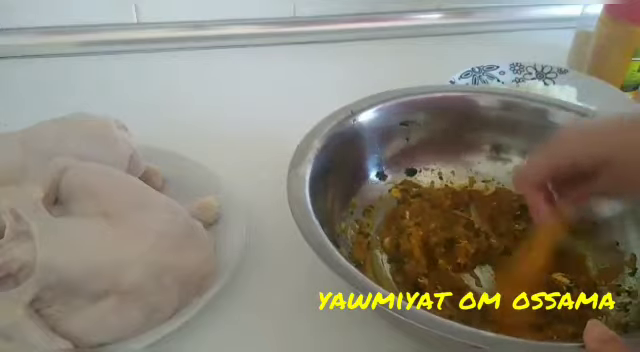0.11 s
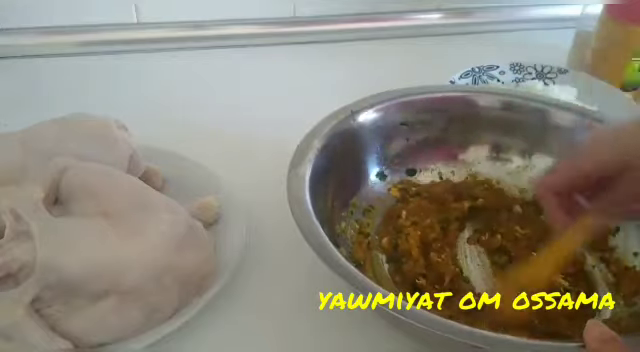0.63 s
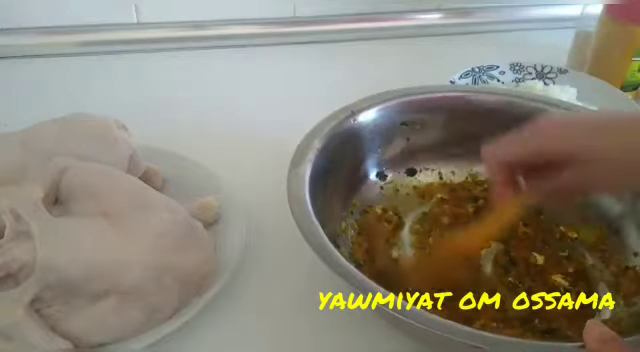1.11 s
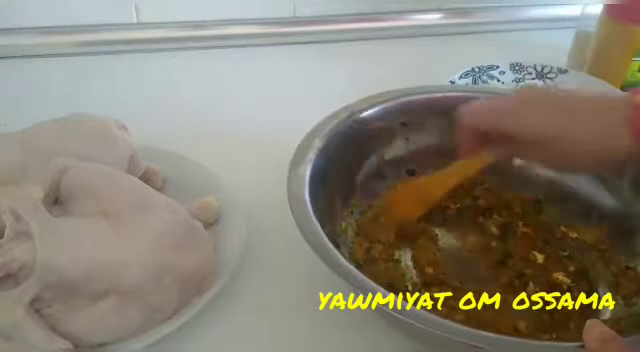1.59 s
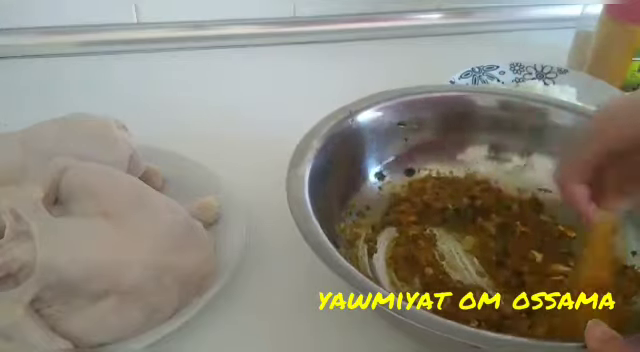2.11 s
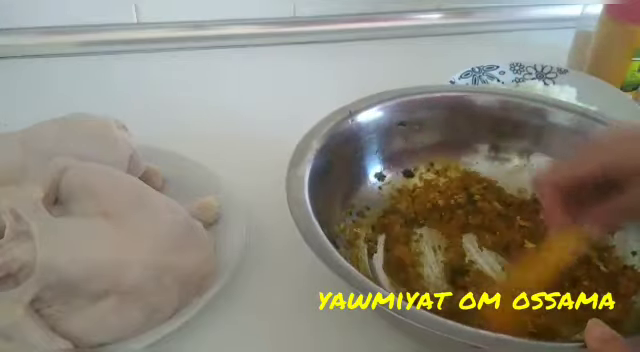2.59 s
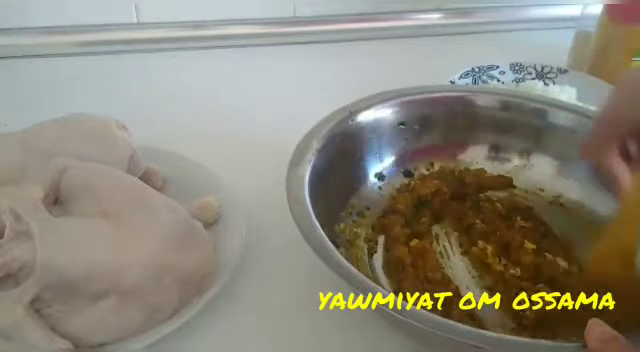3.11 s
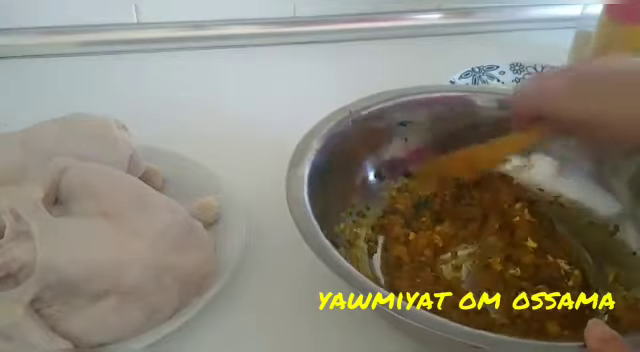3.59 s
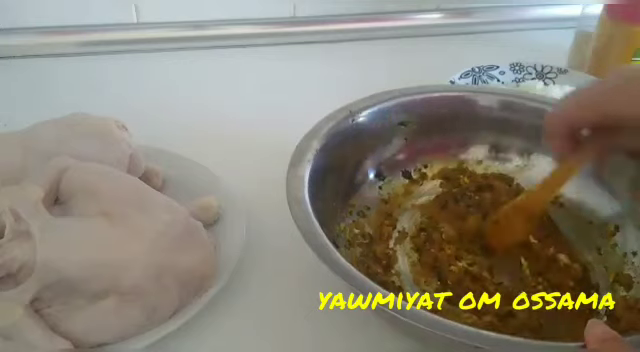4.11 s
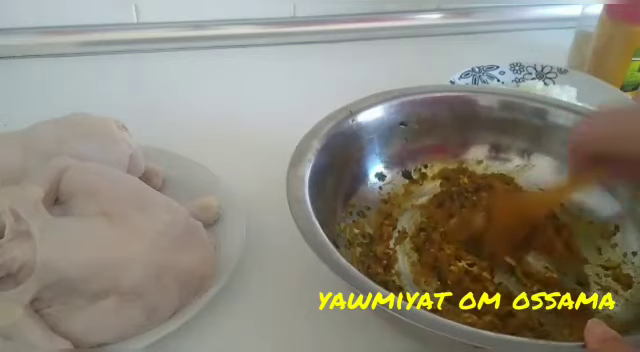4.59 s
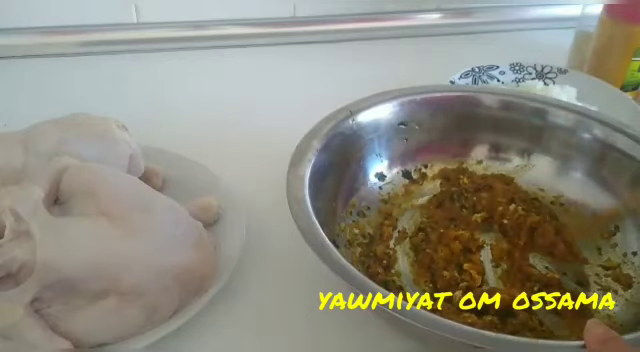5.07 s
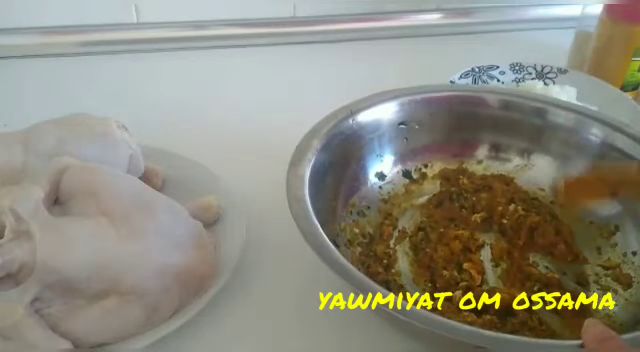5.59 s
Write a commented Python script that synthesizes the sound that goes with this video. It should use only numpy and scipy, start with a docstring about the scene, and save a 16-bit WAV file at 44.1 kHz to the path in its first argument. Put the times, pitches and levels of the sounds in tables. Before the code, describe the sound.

Close wet stirring and scraping in a metal bowl, quiet and uneven, broken by a metallic tap and ending on a hard rattling bang.

```python
"""Stirring thick marinade in a steel bowl

On a kitchen counter, near a phone with two microphones, a spatula stirs thick marinade in a steel bowl.
Splashes of noise are the blade smacking the paste, ringing modes are its knocks on the bowl, and friction noise
through resonances is its drag along the wall, with squeaks, dry ticks and spells of steady narrow-band noise.
The tiled kitchen answers over a low rumble; the phone's noise suppressor thins out whatever is quiet."""
import sys
import numpy as np
from scipy import signal
from scipy.fft import rfft, irfft, next_fast_len
from scipy.io import wavfile
from scipy.ndimage import uniform_filter1d, map_coordinates

SR = 44100
rng = np.random.default_rng(int(sys.argv[2]) if len(sys.argv) > 2 else 0)


def makeup_ratio(level_db):
    """Linear amplitude ratio for a level in decibels (20 dB per factor of ten)."""
    decades = np.asarray(level_db, float) / 20
    return 10 ** decades


def unload_audio(sound):
    """Save the sound as a 16-bit wav file, at the path given as the first command line argument."""
    columns = np.transpose(np.atleast_2d(sound))
    # keep every value between -1 and 1, then stretch to whole-number steps
    steps = np.round(np.clip(columns, -1, 1) * 32767)
    wavfile.write(sys.argv[1], SR, steps.astype(np.int16))


N = 251811


def unit(x):
    """Scaled to rms 1."""
    return x / np.sqrt(np.mean(x ** 2) + 1e-20)


def along(points, hz):
    """Interpolates (Hz, value) points on a log frequency axis."""
    f, v = np.transpose(points)
    return np.interp(np.log(hz + 1), np.log(f + 1), v)


def wobble(rate):
    """A smooth random curve, rate knots a second."""
    return map_coordinates(rng.standard_normal(int(N * rate / SR) + 4), [np.arange(N) * rate / SR])


def filtered(x, response):
    """x times a complex response of frequency."""
    m = next_fast_len(x.shape[-1] + 8192)
    spectrum = rfft(x, m) * response(np.fft.rfftfreq(m, 1 / SR))
    return irfft(spectrum, m)[..., :x.shape[-1]]


def ringing(modes, f):
    """Causal response of resonances (Hz, width Hz, dB), added with alternating sign."""
    total = 0
    for k, (centre, width, db) in enumerate(modes):
        total = total + (-1) ** k * makeup_ratio(db) * 1j * f * width / (centre * centre - f * f + 1j * f * width)
    return total


# How alike the two microphones hear diffuse noise.
# Each row: frequency in Hz, left-right likeness from 0 to 1.
LIKENESS = [(60, 0.96), (130, 0.94), (280, 0.65), (620, 0.3), (1300, .03)]


def pair(n):
    """Stereo white noise, alike in the bass and almost unrelated in the treble."""
    def mid_and_side(hz):
        turn = np.arccos(np.clip(along(LIKENESS, hz), -1, 1)) / 2
        return np.array([np.cos(turn), np.sin(turn)])
    mid, side = filtered(rng.standard_normal((2, n)), mid_and_side)
    return np.array([mid + side, mid - side])


def patchy(x, depth_db):
    """Random gain streaks of depth_db rms, a few hundred Hz wide and under a tenth of a second long."""
    z = signal.stft(x, nperseg=512)[2]
    field = uniform_filter1d(rng.standard_normal(z.shape[1:]), size=3, axis=0)
    field = uniform_filter1d(field, size=12, axis=1)
    return signal.istft(z * makeup_ratio(depth_db * unit(field)), nperseg=512)[1][:, :N]


def burst(rise_ms, fall_ms, span):
    """An envelope, span seconds long, that swells to its peak and fades by 1/e every fall_ms."""
    ms = np.arange(round(span * SR)) / SR * 1000
    swell = np.minimum(ms / max(rise_ms, .03), 1) ** 0.57
    return swell * np.exp(-np.maximum(ms - rise_ms, 0) / max(fall_ms, .05))


# Deep layer of the rumble. Each row: time in seconds, rms level in dB.
RUMBLE = [(0.0, -81), (0.09, -67), (0.43, -82), (1.46, -87), (1.61, -68.5), (2.64, -64.5), (2.77, -73.5),
          (3.47, -67), (4.01, -80), (4.1, -64.5), (4.42, -77), (4.63, -56), (4.86, -63), (4.94, -55.5),
          (5.2, -70.5), (5.71, -64.5)]
# Colour of the steady room noise. Each row: frequency in Hz, relative level in dB.
AIR = [(120, -58.5), (200, -5.5), (330, -3), (500, -1.5), (927, -2), (1140, -12.5), (1270, -7), (2670, -6),
       (7160, -9.5), (11100, -8.5), (13500, -10)]
AIR_DB = -60  # rms


def rumble():
    """Noise through two broad low resonances swells and sinks unevenly over the steady air of the room."""
    times, levels = np.transpose(RUMBLE)
    deep_db = np.interp(np.arange(N) / SR, times, levels)

    def hump(centre_hz, width_hz):
        return unit(filtered(pair(N), lambda hz: ringing([(centre_hz, width_hz, 0)], hz) ** 2))
    air = unit(patchy(filtered(pair(N), lambda hz: makeup_ratio(along(AIR, hz))), depth_db=1.0))
    upper_db = deep_db - 6
    return makeup_ratio(deep_db) * hump(56.1, 29.0) + makeup_ratio(upper_db) * hump(128.0, 45) + makeup_ratio(AIR_DB) * air


# Strokes along the wall. Each row: time of most pressure in seconds, hiss level in dB,
# weight on the steel in dB, build-up in seconds per 10 dB, let-go in seconds per 10 dB.
STROKES = [(.0, -57, -4, .1, 0.077), (0.222, -59, -1.5, 0.035, 0.089), (.36, -75, -17, 0.15, 0.022),
           (.49, -60.5, -12, 0.021, 0.07), (0.568, -50, -6.5, 0.051, 0.071), (.76, -52, -17, 0.043, 0.16),
           (1.1, -59.5, -9, 0.23, 0.066), (1.429, -54.5, -6.5, 0.068, 0.041),
           (1.725, -53.5, 0.5, 0.1, 0.047), (2.155, -54, -15, 0.27, 0.16),
           (2.533, -50.5, -7.5, 0.075, 0.062), (2.739, -64.5, -4.5, 0.062, 0.06),
           (2.931, -67, -31, .1, 0.18), (3.16, -58.5, -4.5, 0.13, 0.012), (3.29, -57, -6, 0.094, 0.33),
           (3.62, -68.5, -0.5, 0.19, 0.35), (3.69, -63, -5, 0.072, 0.14), (3.929, -62, -12, 0.027, 0.17),
           (4.39, -53, -8, 0.042, 0.033), (4.5, -81, 12, 0.19, 0.048), (4.679, -63, 12.5, 0.13, 0.14),
           (4.9, -62, -15.5, 0.21, 0.17), (5.49, -60.5, 1, 0.15, 0.029)]
GROAN_DB, RASP_DB, RASP_PER_WEIGHT = -3, -2, 0.77  # dB over the hiss; dB per dB of weight


def pressure():
    """Gains over time of groan, rasp and hiss, which take all, part and none of each stroke's weight."""
    t = np.arange(0, N + 64, 64) / SR
    s, db, weight_db, rise, fall = np.transpose(STROKES)[..., None]
    hiss_db = db - 10 * np.where(t < s, (s - t) / rise, (t - s) / fall)
    lifts = (GROAN_DB + weight_db, RASP_DB + RASP_PER_WEIGHT * weight_db, 0)
    return [np.interp(np.arange(N) / SR, t, makeup_ratio(hiss_db + lift).sum(0)) for lift in lifts]


# The paste-damped bowl on its counter. Each row: mode in Hz, width in Hz, relative level in dB.
BOWL = [(120, 37, 14.5), (236, 26, 4.5), (303, 54, -2.5), (445.6, 73, -5.5), (523.5, 24.5, -4.5),
        (610, 23, -13), (668, 17, -5), (706, 22.5, 0.5), (783, 29.5, -6.5), (831.6, 30, -4),
        (1008, 136, -11.5), (1251, 79, -10), (1564, 120, -10.5), (1712, 65, -11.5), (2144, 130, -14.5)]
# The thin rim of the bowl. Each row: mode in Hz, width in Hz, relative level in dB.
RIM = [(2770, 11, -5), (3695, 27, -4.5), (4510, 55, 1), (5910, 55, 4), (6300, 140, -6.5), (7080, 400, -7),
       (8150, 54, -12), (8640, 250, -30), (9760, 1300, -17), (11000, 61, -4.5)]
# Colour of the low noise, in smacks and rasp. Each row: frequency in Hz, relative level in dB.
BODY = [(900, -17), (1500, -3), (2500, -1.5), (4000, -6), (6500, -38.5)]
# Colour of the high noise, in smacks and hiss. Each row: frequency in Hz, relative level in dB.
SIZZLE = [(900, -19.5), (1800, -19.5), (2800, 1), (4000, 3), (6000, 5), (9000, 5.5), (12000, 7),
          (14000, -3.5)]


def drag():
    """The blade rubs the wall: friction groans in the bowl; gritty noise rasps and hisses, tinged by the rim."""
    # spice grains catch under the edge, about 300 a second
    catches = (rng.random(N) < 300 / SR) * makeup_ratio(rng.normal(1, 5, N))
    grit = makeup_ratio(1.77 * wobble(30.114) + 0.75 * wobble(130))
    grit = grit + np.convolve(catches, burst(0.77, 0.65, 0.017))[:N]

    def groan_tone(hz):
        return (0.64 + ringing(BOWL, hz)) / (1 + (420 / (hz + 1)) ** 3) / (1 + (hz / 1000) ** 4)

    def rub(colour):
        noise = filtered(grit * pair(N), lambda hz: makeup_ratio(along(colour, hz)) * (1 + 0.2 * ringing(RIM, hz)))
        return unit(patchy(noise, depth_db=4.0))
    groan = unit(filtered(patchy(pair(N), depth_db=5.5), groan_tone))
    groan_gain, rasp_gain, hiss_gain = pressure()
    return groan_gain * groan + rasp_gain * rub(BODY) + hiss_gain * rub(SIZZLE)


def narrow_spells(spells, gain):
    """Noise through blurred resonances, drifting in pitch, each spell swelling and fading."""
    out = np.zeros((2, N + 2 * SR))  # one second of room before the start
    waver = 1 + 0.007 * wobble(12)  # share by which the pitch drifts
    for start, end, bands, db in spells:
        n = round((end - start) * SR)
        band = unit(filtered(pair(n), lambda hz: sum(ringing([b], hz) ** 2 for b in bands)))
        when = (round(start * SR) + np.arange(n)) % N
        clock = np.cumsum(waver[when])
        clock = clock * (n - 1) / clock[-1]
        band = np.array([np.interp(clock, np.arange(n), side) for side in band])
        swell = np.sin(np.pi * np.arange(n) / n) ** 0.41
        out[:, round((start + 1) * SR):][:, :n] += makeup_ratio(db) * band * gain[when] * swell
    return out[:, SR:SR + N]


# Spells of steady narrow-band noise: low rumble swells below 140 Hz, fuzzy held tones above.
# Each row: start in seconds, end in seconds, centre in Hz, resonance width in Hz, level in dB before the swell.
HELD_BANDS = [(-.1, .55, 883, 108, -67.5), (-.1, 0.368, 1325, 150, -74.5), (0.602, 0.957, 910, 240, -64.5),
              (0.895, 1.047, 1048, 59, -71.5), (1.085, 1.285, 990, 190, -70.5),
              (1.028, 1.316, 1282, 87, -72), (1.372, 1.472, 2257, 130, -53), (1.329, 1.411, 400, 45, -66),
              (1.622, 1.902, 726, 9.6, -71.5), (1.656, 1.87, 357, 29, -67), (1.98, 2.68, 136, 67, -58.5),
              (2.12, 2.308, 464, 22, -70.5), (2.44, 2.76, 849, 8.7, -68.5), (2.545, 2.596, 2296, 68, -56),
              (2.92, 3.4, 130, 35, -67.5), (3.087, 3.249, 444, 45, -67.5), (3.35, 3.8, 502, 26, -68.5),
              (3.547, 3.995, 601.7, 23, -62.5), (3.959, 4.274, 610, 29, -68),
              (4.349, 5.354, 587.6, 53, -62.5), (4.419, 4.66, 1934, 104, -66.5),
              (4.579, 4.753, 1690, 100, -60), (4.498, 5.443, 65, 8, -68), (4.578, 5.047, 653, 510, -55),
              (4.759, 5.091, 117, 13, -65.5), (5.0, 5.355, 2686, 38, -74), (5.271, 5.566, 2594, 42, -72),
              (5.001, 5.555, 1330, 53, -73), (5.011, 5.531, 1964, 160, -73), (5.05, 5.552, 878, 63, -67),
              (5.152, 5.295, 1478, 50, -66.5), (5.002, 5.535, 416, 230, -75.5),
              (5.284, 5.557, 744, 8.6, -63), (5.53, 5.78, 115, 55, -51)]


def held_bands():
    """Low rumble swells and fuzzy held tones: noise in one narrow band per spell."""
    spells = [(start, end, [(hz, width, 0)], db) for start, end, hz, width, db in HELD_BANDS]
    return narrow_spells(spells, np.ones(N))


# How long the tiled kitchen rings.
# Each row: frequency in Hz, time in seconds for the tail to fall by 60 dB.
KITCHEN = [(100, 0.5), (250, 0.26), (600, 0.3), (2000, 0.41), (6000, 0.37), (12000, 0.26)]


def add(out, s, sound, wet_db):
    """Adds a sound with its own kitchen tail, each frequency dying at its own speed; left is slightly louder."""
    hz, t, z = signal.stft(pair(SR // 3), SR, nperseg=256)
    decay = makeup_ratio(-60 * t / along(KITCHEN, hz)[:, None])
    tail = signal.istft(z * decay, SR, nperseg=256)[1]
    tail *= (1 - np.exp(-np.arange(tail.shape[1]) / SR / .007)) ** 2  # walls answer after a few ms
    wet = signal.fftconvolve(sound, makeup_ratio(wet_db) * tail / np.linalg.norm(tail[0]), axes=1)
    wet[:, :sound.shape[1]] += sound
    out[:, round(s * SR):][:, :wet.shape[1]] += wet * makeup_ratio([[.35], [-.35]])


# Wet smacks of the blade. Each row: time of the peak in seconds, sizzle level in dB, body level in dB,
# rise in ms, share thrown into the kitchen in dB.
SMACKS = [(0.113, -48.5, -84, 1.16, 0), (0.183, -53.5, -80, 9.4, 0), (0.2634, -43, -37.5, 3.6, -5),
          (0.535, -42, -31.5, 3.8, 0.5), (0.553, -38, -31, 2.24, -9.5), (0.644, -45, -38.5, 1.73, 4.5),
          (0.839, -47.5, -41.5, 16, -1), (0.949, -47, -54.5, 2.45, -1), (1.053, -50, -44, 4.8, -2.5),
          (1.296, -43, -35, 0.82, -11.5), (1.313, -42.5, -35.5, 9.4, -9), (1.404, -59, -36, 7.4, -2),
          (1.42, -81, -34.5, 6, -13), (1.591, -51, -60, 4.8, -8), (1.605, -39, -43.5, 5.7, 3),
          (1.941, -52, -39, 1.42, -7), (2.11, -51.5, -44.5, 19, -31), (2.4089, -41.5, -69, 1.24, -0.5),
          (2.456, -30, -37, 0.55, -2.5), (2.580, -46.5, -40, 5.2, -5), (2.747, -47, -48, 3.5, 0),
          (2.778, -49, -33, 2.06, -6), (2.783, -40.5, -33, 1.54, -4.5), (2.858, -46, -58.5, 0.97, -2.5),
          (2.973, -49.5, -87, 4.5, -1.5), (3.03, -53.5, -57, 1.8, 8.5), (3.171, -40, -38, 2.6, -14),
          (3.182, -42, -57, 2.6, 0.5), (3.229, -48, -31, 1.9, -12.5), (3.284, -48.5, -78, 4.2, -20),
          (3.333, -51.5, -81, 3, 5), (3.402, -43.5, -39, 1.8, 3.5), (3.669, -50, -37.5, 11, -4),
          (3.948, -44.5, -58, 0.72, -6), (3.997, -35, -29, 9, -4.5), (4.105, -37, -32, 12.5, -8),
          (4.298, -50, -62, 2.4, -17), (4.308, -35, -48.5, 3.4, -3), (4.668, -56, -60, 1.4, -5),
          (4.676, -42, -50, 5.7, 5), (4.732, -37.5, -41, 1.94, -3), (4.950, -44.5, -49, 1.25, -3),
          (4.991, -49.5, -72, 2.2, -2), (5.539, -15, -32, 0.66, -5)]
SPLASH_FALL_MS, FALL_PER_RISE = 5.4, 0.68  # a slower squeeze also fades more slowly
RIM_WAKES_DB = -26.5  # sizzle level above which the blade strikes bare steel
SPLASH_CUT_PER_HARDER = 0.8  # dB per dB above that level; the rim gains half as much
RIM_MUTED_PER_SOFTER = 0.22  # dB per dB below that level: paste damps the rim
RIM_SCATTER_DB = 1.5


def smacks():
    """Paste squeezed out under the blade: low and high noise that shakes the rim differently each time."""
    out = np.zeros((2, N + 2 * SR))
    for s, sizzle_db, body_db, rise_ms, wet_db in SMACKS:
        muted_db = RIM_MUTED_PER_SOFTER * max(RIM_WAKES_DB - sizzle_db, 0)
        modes = [(hz, width, level - muted_db + RIM_SCATTER_DB * rng.normal()) for hz, width, level in RIM]
        paste = makeup_ratio(-SPLASH_CUT_PER_HARDER * max(sizzle_db - RIM_WAKES_DB, 0))

        def response(hz):
            tone = makeup_ratio(body_db + along(BODY, hz)) + makeup_ratio(sizzle_db + along(SIZZLE, hz))
            return tone * (0.66 * paste + ringing(modes, hz) / np.sqrt(paste))
        push = burst(rise_ms, SPLASH_FALL_MS + FALL_PER_RISE * rise_ms, .1)
        # a sharp snap at the height of the smack, weaker when the squeeze is slow
        snap = burst(0.042, 0.28, .01) / (1 + rise_ms / 5)
        push[round(rise_ms * SR / 1000):][:SR // 100] += snap
        splash = filtered(push * rng.standard_normal((2, len(push))), response)
        add(out, s - rise_ms / 1000, splash, wet_db)
    return patchy(out[:, :N], depth_db=2.5)


# Dry ticks of the blade's edge on the steel. Each row: start in seconds, peak in dB before the kitchen,
# centre in Hz, fade time constant in ms.
TICKS = [(0.1137, -58, 7000, 0.79), (.2628, -38, 2880, 1.2), (.2655, -38, 2250, 1.3), (.95, -42, 3050, 2.6),
         (1.601, -38.5, 4100, 1.6), (2.409, -43, 2190, 2), (2.4553, -17.5, 10600, 1.8),
         (2.457, -36, 8800, 3), (2.7755, -33, 6100, 1.5), (3.23, -39, 1720, 1.8), (3.947, -42, 6900, 1.1),
         (3.9963, -29, 2910, 0.69), (4.104, -37, 2760, 0.92), (4.67, -36, 7000, 1),
         (4.692, -31.5, 9800, 1.5), (4.731, -30.5, 9000, 1.9), (4.949, -51, 3100, 1.5),
         (5.539, -21, 1735, 1.6)]
TICK_WIDTH = 0.35  # resonance width over centre


def ticks():
    """The edge scratches the steel: brief noise around one pitch, much alike at both microphones."""
    out = np.zeros((2, N + 2 * SR))
    for s, db, centre_hz, ms in TICKS:
        shape = burst(0.99, ms, 0.027)
        noise = rng.standard_normal((3, len(shape)))
        scratch = shape * (noise[0] + 0.53 * noise[1:])  # one shared part, two separate
        tick = filtered(scratch, lambda hz: ringing([(centre_hz, TICK_WIDTH * centre_hz, 0)], hz) ** 2)
        add(out, s, makeup_ratio(db) * tick / np.abs(tick).max(), wet_db=-7.0)
    return out[:, :N]


# Dull knocks on the bowl. Each row: start in seconds, peak in dB before the kitchen,
# most excited pitch in Hz, chatter time constant in ms.
KNOCKS = [(0.258, -61, 342, 2), (.533, -50.5, 900, 31), (.641, -41, 1050, 63), (0.827, -50, 716, 2.8),
          (1.304, -45.5, 800, 2.1), (1.325, -48, 440, 4.6), (1.44, -54, 840, 2.7), (1.601, -44, 610, 4.4),
          (1.608, -47, 280, 2.5), (1.616, -35, 317, 1.2), (1.624, -39, 730, 18), (2.408, -22, 884, 1.1),
          (2.416, -25.5, 812, 2.6), (2.427, -30.5, 820, 5), (2.501, -39, 860, 2.6), (2.779, -39, 440, 15),
          (3.108, -62, 405, 3.5), (3.229, -41.5, 543, 24), (3.997, -46, 610, 48), (4.308, -46, 258, 17),
          (4.596, -36.5, 510, 2), (4.602, -39, 416, 8.4), (4.672, -42.5, 292, 3.1), (5.5385, -12, 706, 5),
          (5.546, -18.5, 706, 10), (5.557, -18, 600, 2.3), (5.571, -24, 706, 5), (5.579, -24, 706, 7)]
HARD_FOCUS_DB, FOCUS_PER_SOFTER = 4.5, 0.24  # dB per squared octave for the hardest; softer ring fewer modes
NEAREST_DB, NEAREST_OCTAVES = 5.5, .07  # extra ring of the mode that the struck spot sits on
SPOT_SCATTER_DB = 1.5  # mode levels vary from knock to knock
LEFT_LEADS_S = .00021  # the bowl is nearer the left microphone


def knocks():
    """A soft contact rings the bowl modes, most those near the pitch of the struck spot."""
    out = np.zeros((2, N + 2 * SR))
    hardest_db = max(row[1] for row in KNOCKS)
    for s, db, spot_hz, ms in KNOCKS:
        focus_db = HARD_FOCUS_DB + FOCUS_PER_SOFTER * (hardest_db - db)
        modes = []
        for hz, width, level in BOWL:
            octaves = np.log2(hz / spot_hz)
            nearest_db = NEAREST_DB * np.exp(-(octaves / NEAREST_OCTAVES) ** 2)
            scatter_db = SPOT_SCATTER_DB * rng.normal()
            modes.append((hz, width, level - focus_db * octaves ** 2 + nearest_db + scatter_db))

        def response(hz):
            delays = LEFT_LEADS_S * np.array([[0], [1]])
            return ringing(modes, hz) * np.exp(-2j * np.pi * hz * delays)
        rattle = burst(0.069, ms, .2)
        # first touch, then chatter
        blow = burst(0.043, 0.028, .2) + 0.089 * rattle * rng.standard_normal(len(rattle))
        ring = filtered(blow, response)
        add(out, s, makeup_ratio(db) * ring / np.abs(ring).max(), wet_db=-2.5)
    return out[:, :N]


# Squeaks of the edge on the rim. Each row: start in seconds, end in seconds, level in dB
# before the stutter and swell.
SQUEAKS = [(0.64, 0.794, -58), (2.272, 2.42, -59), (2.98, 3.135, -61), (3.85, 3.963, -60),
           (5.197, 5.383, -71.5), (5.391, 5.555, -61)]
# Bands of every squeak. Each row: centre in Hz, resonance width in Hz, relative level in dB before squaring.
SQUEAK_BANDS = [(3600, 470, 1), (4570, 390, 4.5)]


def squeaks():
    """The edge squeaks on the rim as the blade turns: friction noise in two bands, stuttering in level."""
    spells = [(start, end, SQUEAK_BANDS, db) for start, end, db in SQUEAKS]
    return narrow_spells(spells, makeup_ratio(3 * wobble(90)))


def scene():
    """Everything at the two microphones."""
    return rumble() + drag() + held_bands() + smacks() + ticks() + knocks() + squeaks()


def suppress(x, over_db, depth_db):
    """Subtracts the steady room noise above 170 Hz, cell by cell, from a smoothed short-time power."""
    hz, t, z = signal.stft(x, SR, nperseg=1024, noverlap=768)
    power = uniform_filter1d((np.abs(z) ** 2).mean(0), size=3, axis=0)
    power = uniform_filter1d(power, size=8, axis=1, origin=3)  # looks back in time only
    shape = makeup_ratio(2 * along(AIR, hz))
    noise = makeup_ratio(2 * (AIR_DB + over_db)) * shape / shape.sum() * (hz > 170)
    gain = np.clip(1 - noise[:, None] / (np.abs(power) + 1e-20), makeup_ratio(depth_db), 1)
    return signal.istft(z * gain, SR, nperseg=1024, noverlap=768)[1][:, :N]


def low_pass(x):
    """Removes everything above the highest recorded frequency."""
    return signal.sosfilt(signal.butter(12, 14360, fs=SR, output="sos"), x)


def record(dry):
    """The phone's noise suppressor, then a steep band limit at 13.3 kHz."""
    quiet = suppress(dry, over_db=0.3, depth_db=-25)
    mix = filtered(quiet, lambda hz: 1 / (1 + (hz / 13300) ** 70))
    return low_pass(mix)


dry = scene()
out = record(dry)
unload_audio(out)
```